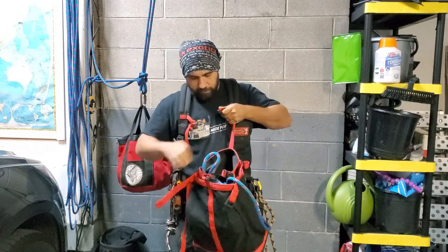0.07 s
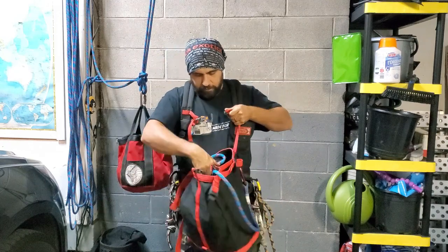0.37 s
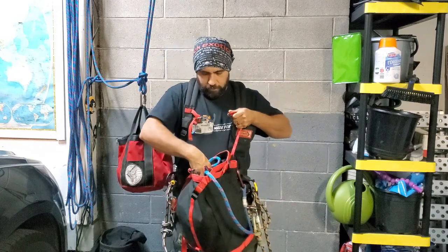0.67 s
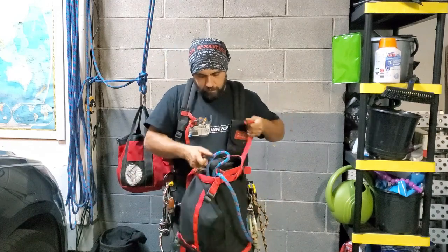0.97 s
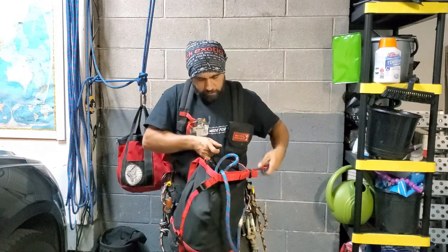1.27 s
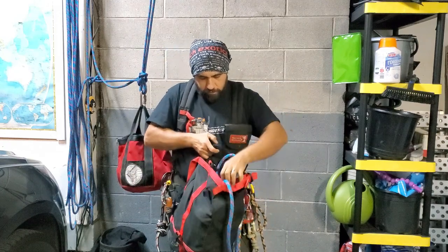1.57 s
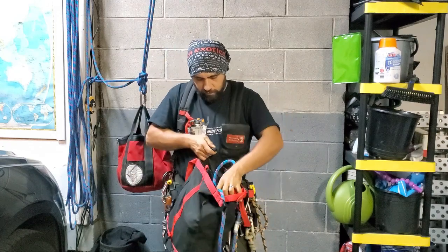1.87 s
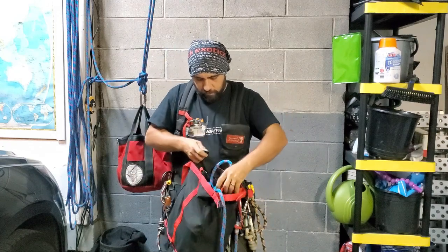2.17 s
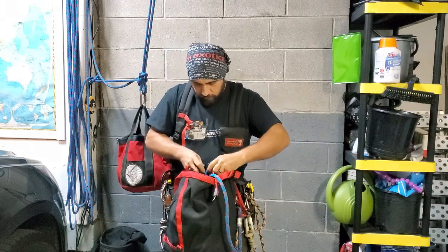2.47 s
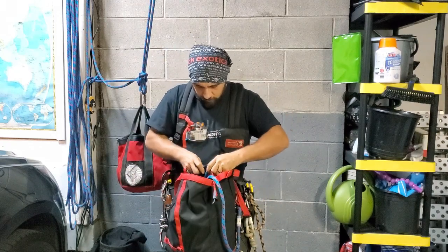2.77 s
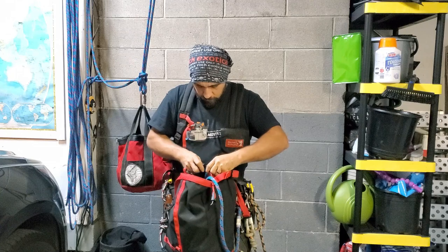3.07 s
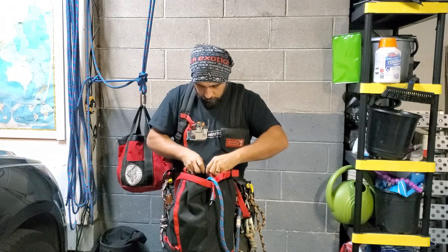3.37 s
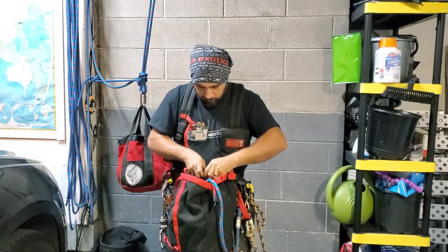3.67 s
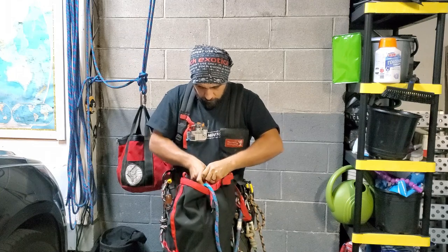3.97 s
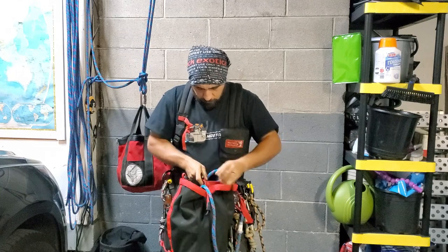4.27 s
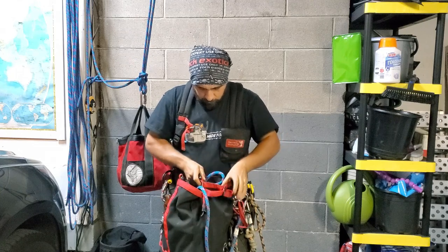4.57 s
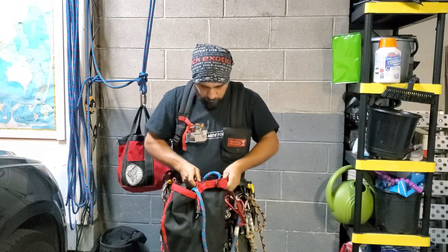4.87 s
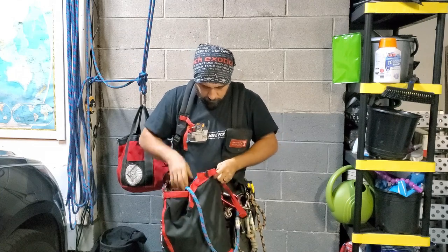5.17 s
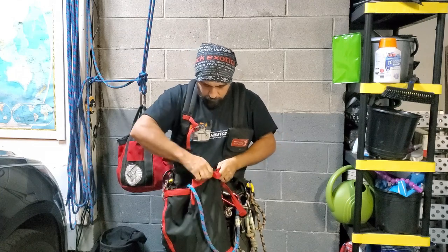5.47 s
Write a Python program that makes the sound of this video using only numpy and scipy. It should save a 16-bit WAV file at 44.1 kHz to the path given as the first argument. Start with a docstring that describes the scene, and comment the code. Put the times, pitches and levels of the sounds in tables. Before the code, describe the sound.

A plastic buckle ticks, then snaps shut amid crumpling cloth, sliding webbing and light clinks of climbing gear in a slightly echoing garage.

```python
"""Stiff fabric rubs and crumples as a rope bag is cinched shut by hand, a few steps away in a garage.
Webbing slides through in tiny slips, metal climbing hardware clinks on the harness, fingers scuff
the cloth and panels pop over. A hollow plastic buckle ticks, then snaps home, the loudest sound.
The bare block walls ring briefly after every sound, over a low rumble, a faint hum and hiss."""
import sys
import numpy as np
from scipy import signal
from scipy.fft import rfft, irfft
from scipy.io import wavfile
from scipy.ndimage import uniform_filter1d

SR = 44100
rng = np.random.default_rng(int(sys.argv[2]) if len(sys.argv) > 2 else 0)


def pcm_store(signal):
    """Save signal as 16-bit PCM."""
    levels = np.round(np.clip(np.atleast_2d(signal), -1, 1) * 32767)
    wavfile.write(sys.argv[1], SR, levels.astype(np.int16).T)


N = 252853
TIME = np.arange(N) / SR

# hands shift the bag: (start [s], length [s], relative crumpling [dB], relative rubbing [dB])
HAND_MOVES = [(0, 0.054, -64, -60.5), (0.164, 0.4, -55, -58), (0.481, 0.1, -51.5, -56.5),
              (0.628, .06, -50, -52.5), (0.726, 0.21, -53.5, -48.5), (0.898, 0.21, -43.5, -51),
              (1.12, 0.25, -52, -54.5), (1.4, .1, -65, -59), (1.481, 0.13, -47, -52),
              (1.647, 0.24, -50.5, -53), (1.937, 0.17, -62, -61), (2.078, 0.13, -50, -47),
              (2.172, 0.096, -42, -45.5), (2.298, 0.13, -46.5, -54.5), (2.465, 0.16, -61, -73.5),
              (3.431, 0.023, -45.5, -67), (4.348, 0.12, -56, -62.5), (4.58, 0.24, -47.5, -57),
              (4.738, 0.29, -47, -54.5), (5.009, 0.14, -47, -50.5), (5.334, 0.041, -47, -66),
              (5.454, 0.046, -57, -64)]
# two tones of the panels, loose and then taut, each: (frequency [Hz], level [dB])
PANEL_TONES = [
    [(53, -31), (90, 1), (156, 0.5), (382, 6), (425, -3.5), (706, 4), (960, -5.5), (1190, 3), (1710, -20.5),
     (2200, -17), (2860, -42), (4840, -120)],
    [(53, -39.5), (90, -9.5), (177, -25), (241, 8), (275, -5.5), (352, 9), (433, -9), (568, -0.5),
     (1020, -7), (2000, -16.5), (2600, -53), (4400, -120)],
]
# cloth rubbing as heard, its quiet treble muffled above about 7.5 kHz: (frequency [Hz], level [dB])
HEARD_RUB_TONE = [(300, 1), (900, 1), (1600, 2.5), (3500, -0.5), (6700, -3), (8200, -16.5), (10500, -15.5),
                  (15500, -11)]
# low rumble and background hiss, the hiss dipping sharply near 8 kHz: (frequency [Hz], level [dB])
BACKGROUND_TONE = [(12, -51), (20, -43), (60, 0.5), (222, -7.5), (357, -6.5), (472, -9.5), (923, -13.5),
                   (1060, -18.5), (1190, -16.5), (2390, -23), (6010, -26), (7520, -32.5), (8180, -50),
                   (14700, -33.5), (16000, -37)]
# quick slides of strap and rope: (time [s], level [dB], fade [s], brightness [dB per octave])
STRAP_SLIDES = [(0.176, -40.5, 0.017, -3), (0.528, -45.5, 0.028, -5.5), (.747, -51.5, 0.03, -1),
                (.942, -38, 0.052, -2), (.984, -23, 0.015, 16.5), (1.009, -30, 0.013, 2.5),
                (1.202, -33.5, 0.0049, 5), (2.236, -37.5, .009, 3), (5.345, -43, 0.008, -1)]
# tone of sliding webbing: (frequency [Hz], level [dB])
WEBBING_TONE = [(200, -2), (450, -14), (800, 4.5), (1800, 6), (3300, 13), (4800, 2.5), (6600, 8.5),
                (9000, -7), (12500, -3), (15500, -9.5)]
# metal touches: (time [s], level [dB], piece [0 carabiner, 1 ring], brightness [dB per octave])
METAL_CLINKS = [(.2, -36.5, 0, 5.5), (.394, -51, 1, 0.5), (4.426, -54, 1, 0), (4.439, -50.5, 1, 0),
                (5.595, -56.5, 1, -1)]
# the notes a carabiner rings with: (frequency [Hz], level [dB], time to fade by 60 dB [s])
CARABINER_NOTES = [(3290, -6, .1), (4610, -4, 0.071), (4640, -5, 0.076), (5630, -1.5, 0.074),
                   (5916, -4.5, 0.078), (9400, -23, 0.18), (10670, -24, .16), (13070, -25, .12)]
# the notes of a metal ring: (frequency [Hz], level [dB], time to fade by 60 dB [s])
RING_NOTES = [(2310, -4.5, 0.12), (3410, -5, .1), (6150, -2, 0.1), (8230, -7, 0.16), (9300, -19, 0.14),
              (14200, -8, 0.1)]
# fingers and rope scuff the cloth: (middle time [s], level [dB], pitch [Hz])
CLOTH_SCUFFS = [(.36, -55, 1490), (0.768, -54, 3570), (.96, -44, 1270), (1.0, -53, 375), (1.03, -45, 740),
                (1.75, -53.5, 1530), (2.19, -45.5, 850), (2.235, -44.5, 282), (2.242, -43.5, 1520),
                (2.254, -44, 720), (2.737, -64.5, 4270), (2.85, -64, 2530), (2.853, -55.5, 995),
                (4.68, -54, 1200), (4.778, -55, 5300), (5.1, -45, 125), (5.125, -51.5, 2680)]
# the bag's panels give way: (time [s], level [dB], pitch [Hz])
PANEL_POPS = [(0.917, -29.5, 550), (.936, -31.5, 620), (1.751, -35.5, 640), (2.127, -31.5, 1280),
              (2.221, -37, 400), (2.24, -27, 775), (2.465, -35.5, 336), (2.523, -39.5, 354),
              (2.559, -39.5, 600), (2.917, -41.5, 370), (3.152, -43, 338), (4.121, -41.5, 360),
              (4.622, -37, 356), (4.709, -36.5, 1210), (4.712, -37, 415), (4.795, -35, 370),
              (4.821, -39, 350), (4.849, -37, 375), (4.913, -35.5, 465), (4.979, -38, 740),
              (5.025, -35.5, 231), (5.051, -41.5, 92), (5.085, -38, 249)]
# tone of a fold flicking over: (frequency [Hz], level [dB])
CREASE_TONE = [(100, -27), (500, 8), (1200, 11), (2600, -10), (5000, -19.5), (12000, -29)]
# buckle ticks and snap: (time [s], level [dB], tone narrowing [dB per octave squared], added crack [dB])
BUCKLE_CLICKS = [(1.202, -37.5, -3.5, -5), (1.206, -43.5, -12, 12), (2.412, -38.5, 0, -19),
                 (2.517, -46.5, 19, -17), (2.913, -42.5, 60, -19), (3.0735, -53, 14, -31),
                 (3.152, -61, 35, -21), (3.432, -56, 9, -25), (3.4764, -54.5, 22, -26),
                 (3.8753, -8.5, 0, -15), (4.171, -47, -3.5, -30), (4.315, -51.5, -4, -5),
                 (4.605, -55, -1, -3), (5.132, -35, 8, -6.5)]
# tone of the hollow plastic buckle: (frequency [Hz], level [dB])
BUCKLE_TONE = [(120, -34), (430, -20), (850, -3.5), (1450, -17), (2380, -14), (2850, 4), (3280, -6),
               (3680, 2.5), (4230, -21), (4600, 0), (5550, .5), (6750, -3), (8300, -15), (15500, -22)]
# tone of the bare crack where plastic meets plastic: (frequency [Hz], level [dB])
CRACK_TONE = [(100, -27.5), (400, -19.5), (850, 0), (1500, -20), (3000, -22), (8000, -1.5), (11000, -2),
              (15500, 8)]
# how alike left and right are for sound from all around: (frequency [Hz], likeness [0 to 1])
STEREO_LIKENESS = [(60, 0.72), (140, 0.98), (260, 0.69), (500, 0), (1000, 0), (16000, 0.22)]
# how long the walls ring: (frequency [Hz], time to fade by 60 dB [s])
ECHO_TIMES = [(120, 0.13), (400, 0.51), (1000, 0.36), (3000, 0.44), (6000, 0.36), (10000, 0.33),
              (16000, 0.14)]


def gain_of(db):
    """Turns decibels into a number to multiply by."""
    return 10 ** (np.asarray(db) / 20)


def evened(x):
    """Scales a sound to an average strength (rms) of 1."""
    return x / np.sqrt(np.mean(x ** 2) + 1e-20)


def even_hit(x):
    """Scales a hit so that its loudest two milliseconds have strength 1."""
    return x / np.sqrt(uniform_filter1d(x ** 2, 88, mode="constant").max())


def look_up(table, hz):
    """Reads between a table's rows, with frequency spaced in octaves."""
    row_hz, value = np.transpose(table)
    return np.interp(np.log(hz + 1), np.log(row_hz + 1), value)


def colour(x, tone, tilt_db=0):
    """Gives a sound a tone, tilted by tilt_db for each octave above 800 Hz."""
    hz = np.fft.rfftfreq(x.shape[-1], 1 / SR)
    octaves = np.log2(np.maximum(hz, 800) / 800)
    return irfft(rfft(x) * gain_of(look_up(tone, hz) + tilt_db * octaves), x.shape[-1])


def resonate(x, pitch, width):
    """Keeps the sound near one pitch; width is a fraction of that pitch."""
    hz = np.fft.rfftfreq(len(x), 1 / SR)
    return evened(irfft(rfft(x) / (1 + ((hz - pitch) / (width * pitch)) ** 2), len(x)))


def ring_after_hit(db):
    """The spectrum of a body with this tone that rings only after it is hit."""
    log_gain = np.maximum(db, -100) * np.log(10) / 20
    mirrored = np.concatenate([log_gain, log_gain[-2:0:-1]])
    return np.exp(np.conj(signal.hilbert(mirrored)))[:len(db)]


def add(mix, start_s, sound):
    """Mixes a sound in at a time."""
    part = mix[max(round(start_s * SR), 0):][:len(sound)]
    part += sound[:len(part)]


def wander(per_s):
    """A smooth random curve that changes about so often a second."""
    hz = np.fft.rfftfreq(N, 1 / SR)
    return evened(irfft(rfft(rng.standard_normal(N)) / (1 + (hz / per_s) ** 4), N))


def slips(per_s, spread_db, clump_db):
    """Friction as tiny slips of uneven size that come in clumps."""
    size = gain_of(spread_db * np.minimum(rng.exponential(1, N), 4)) * rng.standard_normal(N)
    slipping = rng.random(N) < per_s / SR
    return evened(size * slipping * gain_of(clump_db * wander(77)))


def all_around(pair):
    """Makes two noises seem to come from all around: alike in the bass, unlike in the treble."""
    left, other = rfft(pair)
    alike = look_up(STEREO_LIKENESS, np.fft.rfftfreq(pair.shape[1], 1 / SR))
    right = alike * left + np.sqrt(1 - alike ** 2) * other
    return irfft(np.array([left, right]), pair.shape[1])


def fabric(grab_s=0.018, settle_s=0.017, taut_from_s=3.5, crumple_trim_db=-6.5, rub_trim_db=-3.0):
    """Panels crumple in coarse dull grains while the weave rubs in fine bright ones."""
    coarse = slips(per_s=1600, spread_db=1.0, clump_db=4.0)
    fine = evened(colour(slips(per_s=7000, spread_db=2.5, clump_db=1.5), HEARD_RUB_TONE))
    crumpling, rubbing = gain_of(-65.5), gain_of(-85.5)  # the bag never hangs quite still
    for start, length, crumple_db, rub_db in HAND_MOVES:
        grab = np.clip((TIME - start) / grab_s, 0, 1)
        pull = grab * np.exp(-np.maximum(TIME - start - length, 0) / settle_s)
        crumpling = np.hypot(crumpling, gain_of(crumple_db) * pull)
        rubbing = np.hypot(rubbing, gain_of(rub_db) * pull)
    loose, taut = (evened(colour(coarse, tone)) for tone in PANEL_TONES)
    panels = np.where(TIME < taut_from_s, loose, taut)
    return gain_of(crumple_trim_db) * crumpling * panels + gain_of(rub_trim_db) * rubbing * fine


def folds(x, patchy_db=2.5):
    """Shifting folds favour now one band of pitches, now another."""
    bands = signal.stft(x, SR, nperseg=256, noverlap=192)[2]
    drift = uniform_filter1d(rng.standard_normal(bands.T.shape), size=28, axis=0)  # smooth in time
    patches = evened(uniform_filter1d(drift, size=4, axis=1)).T  # and in pitch
    return signal.istft(bands * gain_of(patchy_db * patches), SR, nperseg=256, noverlap=192)[1][:N]


def background(noise_db=-54.5, hum_hz=57.2, hum_db=-62.5):
    """A low rumble, a faint mains hum and background hiss."""
    noise = evened(colour(all_around(rng.standard_normal((2, N))), BACKGROUND_TONE))
    hum = np.sqrt(2) * np.sin(2 * np.pi * hum_hz * TIME + 0.14 * wander(4.2))
    return gain_of(noise_db) * noise + gain_of(hum_db) * hum


def garage(x, echo_db, lag_s, right_db, build_s=0.0011):
    """The direct sound reaches the right side first; dense wall echoes follow, dying band by band."""
    bounces = rng.choice([-1., 1.], (2, SR)) * (rng.random((2, SR)) < 1 / 8)
    hz, t, bands = signal.stft(all_around(bounces), SR, nperseg=256)
    fade = gain_of(-60 * t / look_up(ECHO_TIMES, hz)[:, None])
    tail = signal.istft(bands * fade, SR, nperseg=256)[1]
    tail *= 1 - np.exp(-(TIME[:tail.shape[1]] / build_s) ** 2)
    tail /= np.linalg.norm(tail, axis=1, keepdims=True)
    echoes = signal.fftconvolve(x[None], tail, axes=1)[:, :N]
    late_left = irfft(rfft(x) * np.exp(-2j * np.pi * np.fft.rfftfreq(N, 1 / SR) * lag_s), N)
    balance = gain_of([[-right_db / 2], [right_db / 2]])
    return (np.array([late_left, x]) + gain_of(echo_db) * echoes) * balance


def straps(rise_s=0.0032):
    """Each slide is a short rush of slips, brighter the faster the webbing runs."""
    out, t = np.zeros(N), np.arange(SR // 3) / SR
    friction = slips(per_s=7500, spread_db=0.5, clump_db=4.0)
    for start, db, fade_s, tilt_db in STRAP_SLIDES:
        rush = evened(colour(friction[round(start * SR):][:len(t)], WEBBING_TONE, tilt_db))
        stroke = np.minimum(t / rise_s, 1) * np.exp(-np.maximum(t - rise_s, 0) / fade_s)
        add(out, start, gain_of(db) * rush * stroke[:len(rush)])
    return out


def hardware(knock_db=4, knock_fade_s=0.0016, chatter=0.97):
    """Metal pieces touch: a hard first instant, then a thin ring that chatters against its neighbours."""
    out, t = np.zeros(N), np.arange(SR // 2) / SR
    knock = 1 + gain_of(knock_db) * np.exp(-t / knock_fade_s)
    for start, db, is_ring, tilt_db in METAL_CLINKS:
        hz, note_db, ring_s = np.transpose(RING_NOTES if is_ring else CARABINER_NOTES)[:, :, None]
        loudness = gain_of(note_db + tilt_db * np.log2(hz / hz[0]) - 60 * t / ring_s)
        notes = loudness * np.sin(2 * np.pi * hz * t)
        notes *= 1 + chatter * evened(uniform_filter1d(rng.standard_normal(notes.shape), size=130))
        add(out, start, gain_of(db) * even_hit(notes.sum(0) * knock))
    return out


def scuffs(length_s=0.078):
    """Light strokes over taut cloth: slips that sing around one pitch."""
    out, stroke = np.zeros(N), np.hanning(round(length_s * SR))
    friction = slips(per_s=5000, spread_db=3, clump_db=-4.5)
    for middle, db, hz in CLOTH_SCUFFS:
        sung = resonate(friction[round(middle * SR):][:len(stroke)], hz, width=0.25)
        add(out, middle - length_s / 2, gain_of(db) * sung * stroke)
    return out


def panel_pops(rough=0.98, rise_s=0.00029, ring_cycles=21.5, flick_fade_s=0.0045):
    """A stiff panel pops over: the crease flicks, then a short low note with a rough puff around it."""
    out, t = np.zeros(N), np.arange(SR // 4) / SR
    for start, db, hz in PANEL_POPS:
        puff = resonate(rng.standard_normal(len(t)), hz, width=0.53)
        loudness = (1 - np.exp(-t / rise_s)) * gain_of(-60 * t * hz / ring_cycles)
        note = (np.sin(2 * np.pi * hz * t) + rough * puff) * loudness
        flick = colour(rng.standard_normal(len(t)), CREASE_TONE) * np.exp(-t / flick_fade_s)
        flick_db = -6.5 + 5 * np.log2(hz / 403)  # smaller, higher folds flick harder
        add(out, start, gain_of(db) * even_hit(even_hit(note) + gain_of(flick_db) * even_hit(flick)))
    return out


def buckle(prong_hz=4900, scrape_s=0.001165, crack_fade_s=0.0041):
    """The prongs scrape and land: a crack, and a plastic body that dies within milliseconds."""
    body, cracks, t = np.zeros(N), np.zeros(N), np.arange(SR // 30) / SR
    hz = np.fft.rfftfreq(len(t), 1 / SR)
    for start, db, narrow_db, crack_db in BUCKLE_CLICKS:
        # a light touch wakes mostly the prongs, so pitches far from theirs are cut
        cut_db = max(narrow_db, 0) * np.log2((hz + 1) / prong_hz) ** 2
        ring = ring_after_hit(look_up(BUCKLE_TONE, hz) - cut_db)
        # each pitch is set ringing at its own instant of the scrape
        delay_s = np.interp(hz, np.linspace(0, SR / 2, 40), scrape_s * rng.random(40))
        click = irfft(ring * np.exp(-2j * np.pi * np.cumsum(delay_s) * hz[1]))
        crack = rng.standard_normal(len(t)) * np.exp(-t / crack_fade_s)
        add(body, start, gain_of(db) * even_hit(click))
        add(cracks, start, gain_of(db + crack_db) * even_hit(crack))
    return body + colour(cracks, CRACK_TONE)


def scene():
    """Soft and hard sounds of the bag in the garage."""
    rustle = garage(folds(fabric() + straps()) + scuffs(), echo_db=1.0, lag_s=0.000379, right_db=2.0)
    pops = garage(panel_pops(), echo_db=-6, lag_s=0.000367, right_db=-1.0)
    ticks = garage(buckle(), echo_db=-0.5, lag_s=0.00002, right_db=1.5, build_s=0.0047)
    clinks = garage(hardware(), echo_db=6.5, lag_s=0.00002, right_db=2.5)
    return rustle + pops + ticks + clinks + background()


def record(dry):
    """Caps the peaks at full scale and cuts the treble above 16150 Hz."""
    treble_cut = signal.firwin(401, 16150, window=("kaiser", 10), fs=SR)
    return signal.oaconvolve(np.clip(dry, -1, 1), treble_cut[None], "same")


dry = scene()
out = record(dry)
pcm_store(out)
```